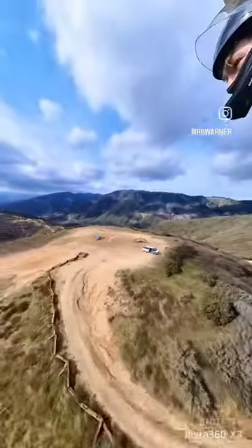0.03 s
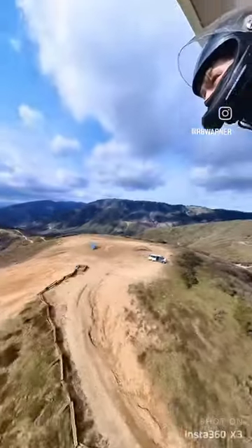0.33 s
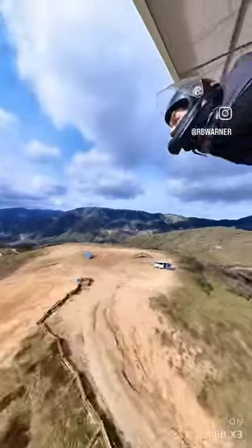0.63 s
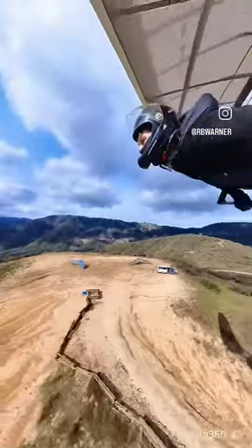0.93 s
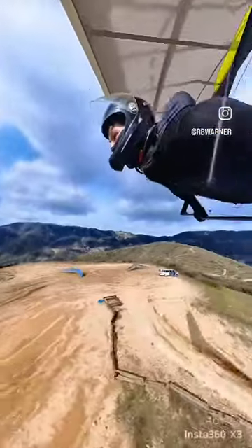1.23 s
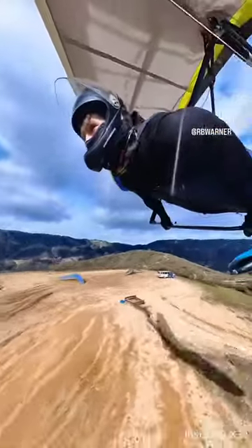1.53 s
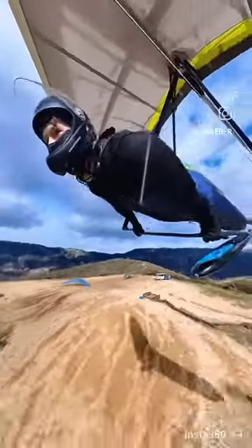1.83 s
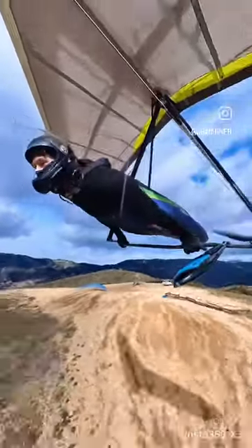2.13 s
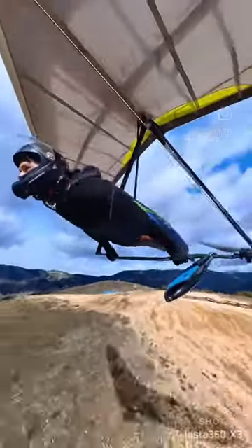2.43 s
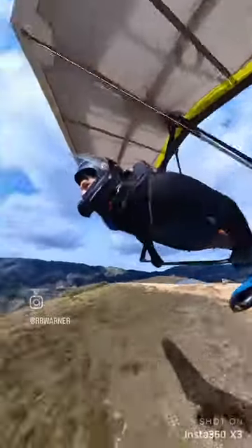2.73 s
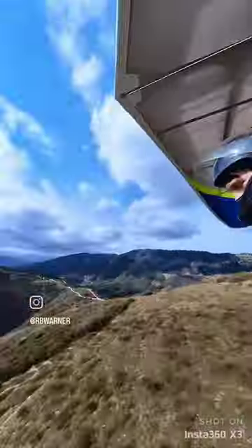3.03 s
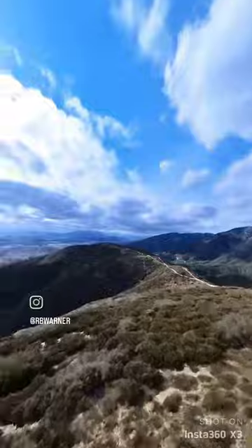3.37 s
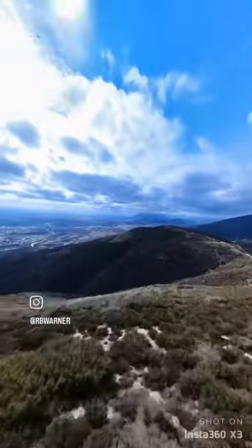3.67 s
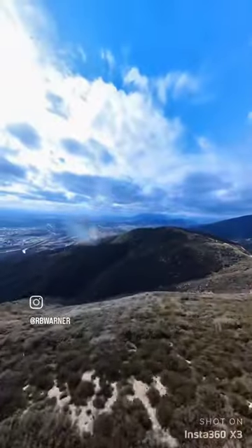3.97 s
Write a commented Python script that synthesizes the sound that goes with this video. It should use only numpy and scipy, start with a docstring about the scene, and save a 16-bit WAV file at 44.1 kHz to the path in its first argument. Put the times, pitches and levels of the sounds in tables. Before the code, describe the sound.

Wind rushes past a hang glider, whistling thinly, before dulling into a gusty rumble.

```python
"""A roar and hiss of air, with an edge whistling near 7 kHz in fluttering spells and short chirps,
as a hang glider skims a hilltop with a camera on a boom. Turbulence over the camera gives the broadband
noise; a jet flapping at an edge gives the whistle. At 2.6 s the hiss and whistle drop away, leaving the
low buffeting of eddies on the microphone, a few ticks and rigging wires that sing by vortex shedding."""
import sys
import numpy as np
from scipy.fft import rfft, irfft, next_fast_len
from scipy.io import wavfile
from scipy.ndimage import uniform_filter1d, map_coordinates

SR = 44100
rng = np.random.default_rng(int(sys.argv[2]) if len(sys.argv) > 2 else 0)


def dump_mix(stems):
    """Bounce the given channels to the path in sys.argv[1] as a 16-bit WAV at rate SR."""
    frames = np.atleast_2d(stems).T  # one column per channel
    limited = np.clip(frames, -1, 1)  # hard clip at full scale
    pcm = np.round(limited * 32767).astype(np.int16)
    wavfile.write(sys.argv[1], SR, pcm)


N = 176400
t = np.arange(N) / SR


def amp(db):
    """Amplitude ratio of a level in decibels."""
    return 10 ** (np.asarray(db) / 20)


def unit(x):
    """Normalisation to rms 1."""
    return x / np.sqrt(np.mean(x ** 2) + 1e-20)


def steady(x):
    """Compression: slow swells are evened out and the fine grain remains, at rms 1."""
    return unit(x / np.sqrt(np.abs(uniform_filter1d(x ** 2, size=1800)) + .05))


def curves(rows):
    """Linear interpolation in time of each column after the first."""
    times, *columns = np.transpose(rows)
    return [np.interp(t, times, column) for column in columns]


def wobble(rate):
    """Smooth random modulation: a spline through `rate` Gaussian knots a second."""
    return map_coordinates(rng.standard_normal(N // 8), [t * rate + 4], mode="wrap")


def filtered(x, response):
    """Linear filtering: the spectrum of x times a frequency response."""
    size = next_fast_len(N + SR // 4)
    return irfft(rfft(x, size) * response(np.fft.rfftfreq(size, 1 / SR)), size)[..., :N]


def noise(spectrum):
    """Spectral shaping of white noise by (f/Hz, relative level/dB) points, at rms 1."""
    f, db = np.transpose(spectrum)
    white = rng.standard_normal(N)
    return unit(filtered(white, lambda hz: amp(np.interp(np.log(hz + 1), np.log(f), db))))


def phase_of(hz):
    """Phase as the time integral of frequency."""
    return 2 * np.pi * np.cumsum(hz) / SR


def narrow(hz, width_hz):
    """Narrow-band noise by random quadrature modulation of a carrier, at rms 1."""
    phase = phase_of(hz + np.zeros(N))
    return unit(wobble(width_hz) * np.cos(phase) + wobble(width_hz) * np.sin(phase))


def turn(bright, dull, centre_s=2.61, length_s=.11):
    """Equal-power cross-fade from the bright flow to the dull one."""
    dull_share = np.clip((t - centre_s) / length_s + .5, 0, 1)
    return np.sqrt(1 - dull_share) * bright + np.sqrt(dull_share) * dull


# Envelope of the roar: t/s, relative level/dB
ROAR_ENVELOPE = [(0, -20), (.3, -22.5), (.4, -22.5), (1.3, -21.5), (2.0, -21.5), (2.59, -21.5), (2.63, -41),
                 (2.68, -31.5), (2.76, -24.5), (2.95, -27), (3.2, -31), (3.44, -30), (3.55, -33.5),
                 (3.78, -34.5), (3.88, -33.5), (4, -35)]
# Its spectra in the bright and the dull flow: f/Hz, relative level/dB
ROAR_BRIGHT_SPECTRUM = [(40, -38), (120, -5), (240, -1.5), (450, 0), (800, -7), (1350, -13.5),
                        (1550, -18.5), (2300, -20.5), (3200, -30.5), (6000, -54.5)]
ROAR_DULL_SPECTRUM = [(60, -25.5), (200, -1.5), (350, -0.5), (600, -6), (1000, -15), (1400, -23.5),
                      (1700, -29), (3000, -36), (6000, -69)]


def roar(eddies):
    """Turbulent airflow makes broadband noise; in the dull flow the eddies modulate its amplitude."""
    db, = curves(ROAR_ENVELOPE)
    bright = noise(ROAR_BRIGHT_SPECTRUM) * unit(amp(1.39 * wobble(60)))
    dull = steady(noise(ROAR_DULL_SPECTRUM)) * unit(amp(.99 * eddies + 1.55 * wobble(140)))
    return amp(db + 1.5) * turn(bright, dull)


# Envelopes of the hiss and of a fine fizz in the dull flow: t/s, relative level/dB
HISS_ENVELOPE = [(0.0, -32), (0.18, -34), (0.2, -30.5), (0.33, -32), (0.36, -43), (0.55, -41), (0.58, -35),
                 (.87, -34.5), (1.18, -35), (1.24, -41), (1.44, -33), (1.47, -40.5), (1.69, -37),
                 (1.71, -44.5), (1.81, -36), (1.91, -42), (1.95, -36), (1.99, -37.5), (2.07, -33),
                 (2.17, -38.5), (2.25, -32), (2.28, -45), (2.34, -46.5), (2.37, -37.5), (2.4, -41.5),
                 (2.51, -36), (2.6, -42.5), (2.64, -65), (2.76, -53), (2.82, -52), (2.85, -59.5),
                 (3.97, -62.5)]
FIZZ_ENVELOPE = [(2.6, -48.5), (2.7, -71.5), (2.76, -69), (2.83, -72.5), (2.88, -82.5), (3.6, -79.5),
                 (3.78, -80.5), (3.85, -71.5), (3.94, -62)]
# Spectra of the bright hiss, dull hiss, stereo side signal and fizz: f/Hz, relative level/dB
HISS_BRIGHT_SPECTRUM = [(1500, -43.5), (2400, -1.5), (3200, -1), (4000, 2), (5200, 1.5), (7500, 0.5),
                        (9300, 0), (9800, -7), (10900, -9), (12400, -18.5), (13000, -35)]
HISS_DULL_SPECTRUM = [(1500, -18), (3000, -0.5), (4300, 7.5), (5000, -1.5), (6300, -2), (8200, -17.5),
                      (9500, -24.5), (13000, -27)]
HISS_SIDE_SPECTRUM = [(2600, -58.5), (3100, -2.5), (5000, 2), (7400, -2.5), (9300, -3.5), (10000, -8),
                      (12400, -17), (13000, -37.5)]
HIGH_FIZZ_SPECTRUM = [(3000, -21), (6000, -6.5), (7600, 0.5), (11500, -3.5), (13000, -13.5)]


def hiss(flutter, eddies):
    """Treble flow noise, amplitude-modulated by the jet while bright and by the eddies once dull."""
    db, = curves(HISS_ENVELOPE)
    fizz_db, = curves(FIZZ_ENVELOPE)
    side = np.outer([1, -1], amp(-5) * noise(HISS_SIDE_SPECTRUM))  # antiphase widens the image
    bright = amp(1.5) * (noise(HISS_BRIGHT_SPECTRUM) + side)
    bright *= unit(amp(.34 * flutter + 1.8 * wobble(500)))
    hollow_howl = amp(-2) * narrow(hz=957, width_hz=750)
    dull = amp(-1.5) * (noise(HISS_DULL_SPECTRUM) + side)
    dull *= unit(amp(3.1 * eddies + 3.1 * wobble(270)))
    fizz = amp(fizz_db) * noise(HIGH_FIZZ_SPECTRUM)
    return amp(db) * turn(bright + hollow_howl, dull) + turn(0, fizz)


def jet_flapping(rate_hz=69.8, spread=.33):
    """Quasi-periodic oscillation of the jet at the edge, a modulator of rms 1."""
    hz = rate_hz * np.exp(spread * wobble(70))
    return unit(np.sin(phase_of(hz)) + .25 * wobble(220))


# Spells of the edge tone, one list each: t/s, f/Hz, relative level/dB
WHISTLE_SPELLS = [
    [(0.0, 7380, -21.5), (.11, 7320, -21.5), (.15, 7580, -20.5), (0.22, 7610, -19), (0.238, 7850, -31),
     (0.258, 7630, -20), (0.338, 8000, -27), (0.37, 8120, -45)],
    [(0.55, 6340, -40), (0.586, 6700, -23.5), (0.64, 6540, -27), (0.656, 6670, -19.5), (.722, 6750, -17.5),
     (.796, 6650, -19), (.814, 6590, -28), (.858, 6735, -14.5), (.91, 6810, -16.5), (0.996, 6780, -17.5),
     (1.03, 6580, -35)],
    [(1.06, 6670, -40), (1.082, 6690, -19.5), (1.115, 6710, -18.5), (1.165, 6810, -16), (1.176, 6810, -29),
     (1.2, 6770, -18), (1.22, 6790, -35), (1.25, 6700, -45)],
    [(1.26, 7200, -57), (1.29, 7200, -36), (1.352, 7040, -32), (1.41, 6760, -34), (1.445, 6650, -24.5),
     (1.48, 6795, -55)],
    [(1.51, 7190, -51), (1.534, 7390, -36), (1.542, 7280, -40), (1.568, 7380, -26), (1.605, 7160, -24.5)],
    [(1.61, 6780, -24), (1.672, 6730, -34), (1.7, 6760, -30), (1.712, 6680, -48)],
    [(1.76, 7080, -39), (1.81, 7080, -41), (1.836, 7070, -23), (1.854, 6830, -26), (1.87, 7000, -28),
     (1.9, 6830, -53.5)],
    [(1.96, 7240, -56), (1.976, 7200, -25), (2.01, 7170, -28.5), (2.056, 7140, -21.5), (2.15, 7020, -22),
     (2.19, 7200, -26), (2.256, 7400, -26), (2.28, 7260, -68)],
    [(2.295, 7420, -54), (2.31, 7470, -35), (2.335, 7830, -46), (2.382, 7760, -29.5), (2.45, 7870, -48),
     (2.466, 7850, -23), (2.532, 8150, -32.5), (2.61, 8300, -59)],
]
# Modulation of the edge tone: t/s, relative depth
WHISTLE_FLUTTER = [(.6, 2.2), (.92, 1), (1.0, 2), (1.85, 4), (2.05, 2.9)]


def whistle(flutter, clean_hz=6400, breathy_hz=8400):
    """Edge tone: turbulence chokes it many times a second; blown higher, it turns to breath noise."""
    hz, db = curves([row for spell in WHISTLE_SPELLS for row in spell])
    depth, = curves(WHISTLE_FLUTTER)
    gate = sum(1. * (t >= spell[0][0]) * (t <= spell[-1][0]) for spell in WHISTLE_SPELLS)
    overblowing = np.clip((hz - clean_hz) / (breathy_hz - clean_hz), 0, 1)
    breath_share = np.clip(.044 + overblowing ** 2, 0, .95)
    jitter_hz = 26.8 * (wobble(260) + .5 * wobble(35))
    jet = np.tanh(flutter + .65)  # biased: mostly at full strength, with brief dips
    choke = steady(unit(amp(depth * jet * (3.5 - breath_share))))
    tone = np.sqrt(2 * (1 - breath_share)) * np.sin(phase_of(hz + jitter_hz)) * choke
    breath = np.sqrt(breath_share) * narrow(hz, width_hz=860)
    upper_skirt = amp(-17.5) * narrow(hz + 1750, width_hz=1000) * choke
    return uniform_filter1d(gate, size=400) * amp(db - 2) * (tone + breath + upper_skirt)


# Bursts of the edge tone: t/s, relative peak level/dB, centre f/Hz
EDGE_CHIRPS = [(1.0445, -11, 6760), (1.18, -12, 6820), (1.2093, -12.5, 6670), (1.3615, -10.5, 6860),
               (1.378, -12, 6770), (1.398, -10.5, 6720), (1.612, -14, 6780), (1.629, -22, 6880),
               (1.6485, -13.5, 6700), (1.6666, -14.5, 6630), (1.688, -18.5, 6800), (1.7002, -15.5, 6700),
               (1.845, -18, 6740), (1.9443, -10.5, 6830)]


def chirps(length_s=.014, rise_hz_per_s=14000):
    """Lock-in: the edge tone catches briefly and sweeps upward, with a spit of hiss."""
    spit = amp(-14.5) * noise(HISS_BRIGHT_SPECTRUM)
    out = np.zeros(N)
    for at, db, hz in EDGE_CHIRPS:
        progress = np.clip((t - at) / length_s + .44, 0, 1)
        tone = np.sin(phase_of(hz + rise_hz_per_s * length_s * (progress - .5)))
        out += amp(db - 2.5) * np.sin(np.pi * progress) ** 2 * (tone + spit)
    return out


# Envelope of the buffeting between gusts: t/s, relative level/dB
BUFFET_ENVELOPE = [(0, -28), (.7, -24.5), (1.2, -26), (2.0, -23), (2.58, -20), (2.63, -37.5), (2.69, -28),
                   (2.76, -25.5), (3.03, -20), (3.2, -22.5), (3.42, -19.5), (3.5, -24.5), (3.74, -21),
                   (3.81, -24.5), (3.87, -17), (3.93, -26), (4, -14)]
# Its spectra in the bright and the dull flow: f/Hz, relative level/dB
BUFFET_BRIGHT_SPECTRUM = [(20, -21.5), (40, -8), (65, -4.5), (110, -2), (180, 1.5), (270, -5.5), (400, -9),
                          (600, -24.5), (1200, -69)]
BUFFET_DULL_SPECTRUM = [(20, -29), (35, -13), (52, 4.5), (80, -13), (120, 2), (180, -11.5), (260, -10.5),
                        (500, -23), (1200, -89)]


def buffet(eddies):
    """Pressure fluctuations of eddies buffet the microphone and, in the dull flow, excite a low boom."""
    db, = curves(BUFFET_ENVELOPE)
    bright = amp(-1) * steady(noise(BUFFET_BRIGHT_SPECTRUM))
    rumble = noise(BUFFET_DULL_SPECTRUM)
    boom = amp(-2.5) * narrow(hz=170.5, width_hz=22)
    dull = amp(2.5) * steady(rumble + boom) * unit(amp(2 * eddies))
    return amp(db) * turn(bright, dull)


# Gusts on the microphone: centre t/s, level/dB, 1/e half-width/s, f/Hz
GUST_THUMPS = [(1.29, -19, 0.078, 300.5), (1.544, -16.5, .05, 244), (1.972, -21, .04, 320.5),
               (2.088, -19.5, 0.028, 150), (2.162, -22, 0.031, 151.6), (2.265, -18, .02, 170),
               (2.313, -14.5, 0.02, 214.2), (2.37, -16, 0.021, 248.5), (2.568, -13.5, 0.036, 189.4),
               (2.767, -19, .033, 161.2), (2.9, -17.5, 0.021, 109), (2.99, -19, .035, 157.7),
               (3.15, -10.5, 0.012, 135), (3.265, -15, 0.02, 111.2), (3.339, -16, 0.046, 165),
               (3.458, -13, 0.015, 170), (3.559, -18.5, 0.044, 125.4), (3.708, -15, .04, 154.5),
               (3.872, -14.5, 0.029, 110), (3.936, -18.5, 0.056, 126)]


def gusts(spread=.33):
    """Each gust thumps as a wave packet: uneven low pressure swings under a Gaussian envelope."""
    wander = np.exp(spread * wobble(130))
    packets = sum(amp(db) * np.exp(-((t - at) / half_width) ** 2) * np.sin(phase_of(hz * wander))
                  for at, db, half_width, hz in GUST_THUMPS)
    return np.sqrt(2) * packets


# Slaps of air: onset t/s, relative peak level/dB
AIR_SLAPS = [(1.543, -10), (3.187, -27), (3.379, -25.5), (3.415, -15.5), (3.45, -14.5), (3.693, -25.5)]
# Their spectrum: f/Hz, relative level/dB
AIR_SLAP_SPECTRUM = [(150, -12), (400, 0), (700, 7.5), (1300, -9.5), (2500, -28), (6000, -57.5)]


def slaps(decay_s=.0065):
    """Impulsive excitation: small eddies strike the microphone and decay exponentially."""
    strikes = sum(amp(db - 7) * (t >= at) * np.exp(-np.abs(t - at) / decay_s) for at, db in AIR_SLAPS)
    return noise(AIR_SLAP_SPECTRUM) * uniform_filter1d(strikes, size=80)


# Bands from other edges: start t/s, end t/s, f/Hz, bandwidth/Hz, level/dB, fade time/s
BREATHY_BANDS = [(0, 0.363, 6280, 697, -32.5, .026), (0.07, 0.372, 1101, 1195, -27, 0.043),
                 (0.168, 0.366, 3830, 880, -35, 0.025), (.36, .55, 6950, 550, -49, .026),
                 (2.279, 2.646, 9720, 1905, -41.5, .09), (2.431, 2.608, 3580, 2210, -36, 0.055),
                 (2.687, 2.911, 951, 1301, -35, 0.054), (2.722, 2.871, 7070, 2200, -59.5, 0.035)]


def breathy_tones(drift_hz=110):
    """Unsteady edge tones: other edges catch the flow for a while and radiate bands of noise."""
    out = np.zeros(N)
    for start, end, hz, width_hz, db, fade_s in BREATHY_BANDS:
        envelope = np.clip(np.minimum(t - start, end - t) / fade_s, 0, 1) ** 2
        out += amp(db) * envelope * narrow(hz + drift_hz * wobble(25), width_hz)
    return out * unit(amp(2 * wobble(50)))


# Ticks in the dull flow: t/s, relative peak level/dB
FAINT_TICKS = [(2.759, -34), (2.819, -31), (2.929, -42), (3.08, -38), (3.3585, -48.5), (3.4504, -39),
               (3.9262, -35.5)]
# Their spectrum: f/Hz, relative level/dB
FAINT_TICK_SPECTRUM = [(1500, -10), (3500, 0.5), (6000, -2), (8000, -10), (9500, -21.5), (13000, -31)]


def ticks(decay_s=.0029):
    """Transients: noise with an exponential rise and fall this short is heard as a tick."""
    envelope = sum(amp(db - 10.5) * np.exp(-np.abs(t - at) / decay_s) for at, db in FAINT_TICKS)
    return noise(FAINT_TICK_SPECTRUM) * envelope


# Tones of the rigging, one list a wire: t/s, f/Hz, level/dB
WIRE_TONES = [
    [(2.9, 2520, -61), (3.12, 2600, -57), (3.18, 2580, -65.5), (3.3, 2610, -57), (3.34, 2650, -48.5),
     (3.38, 2720, -61), (3.45, 2760, -58), (3.48, 2740, -74)],
    [(3.24, 2400, -64), (3.3, 2440, -54), (3.36, 2520, -63), (3.45, 2500, -64.5), (3.56, 2500, -58),
     (3.67, 2460, -53), (3.72, 2390, -59.5), (3.84, 2350, -58.5), (3.92, 2280, -72)],
]
# Envelope of the breathy band around them: t/s, level/dB
WIRE_BAND_ENVELOPE = [(2.75, -62), (2.95, -61), (3.33, -62.5), (3.5, -59.5), (3.85, -58), (3.93, -77)]


def wires():
    """Aeolian tones: vortices shed by the rigging sing as thin gliding notes in a breathy band."""
    band_db, = curves(WIRE_BAND_ENVELOPE)
    out = turn(0, amp(band_db) * narrow(hz=2520, width_hz=420))
    for wire in WIRE_TONES:
        hz, db = curves(wire)
        sounding = uniform_filter1d(1. * (t > wire[0][0]) * (t < wire[-1][0]), size=800)
        flicker_db = 3 * wobble(45)
        waver_hz = 19 * (wobble(40) + 2 * wobble(200))
        out += sounding * amp(db + flicker_db) * np.sin(phase_of(hz + waver_hz))
    return out


def scene():
    """Superposition of all the air sounds, centred but for the hiss."""
    flutter, eddies = jet_flapping(), wobble(30)
    tones = whistle(flutter) + chirps() + breathy_tones() + wires()
    return tones + roar(eddies) + buffet(eddies) + gusts() + slaps() + ticks() + hiss(flutter, eddies)


def record(dry):
    """Band limiting: the camera acts as an ideal low-pass filter."""
    return filtered(dry, lambda hz: hz < 13650)


dry = scene()
out = record(dry)
dump_mix(out)
```